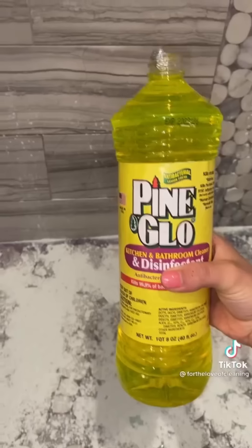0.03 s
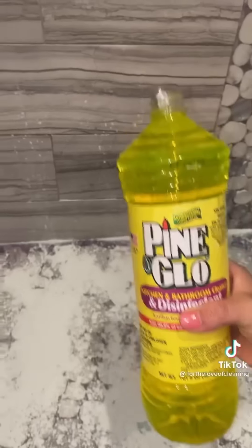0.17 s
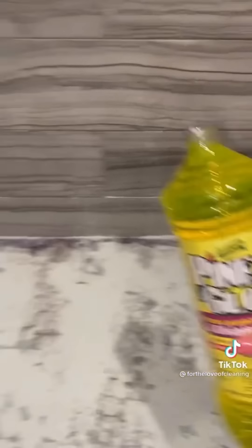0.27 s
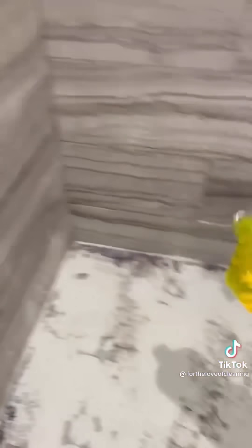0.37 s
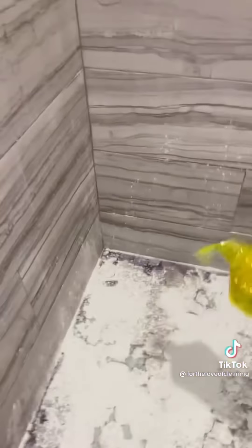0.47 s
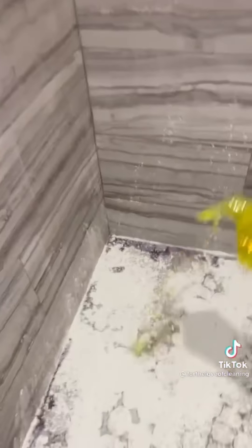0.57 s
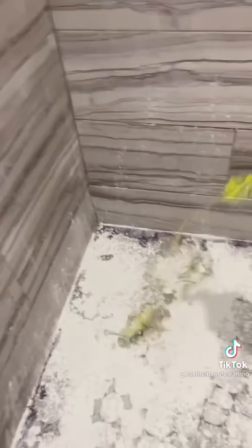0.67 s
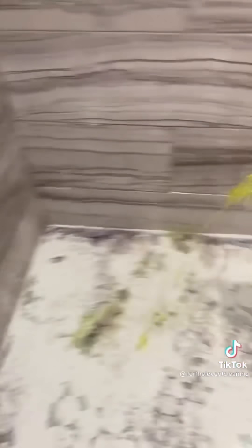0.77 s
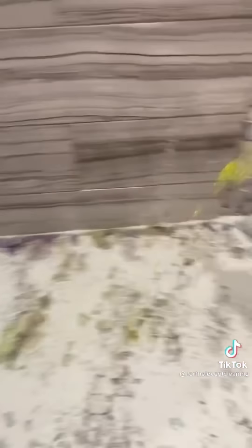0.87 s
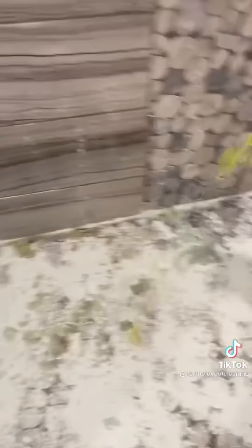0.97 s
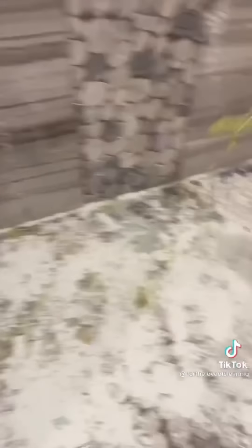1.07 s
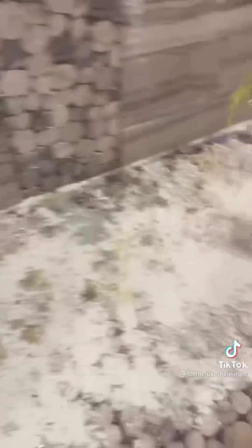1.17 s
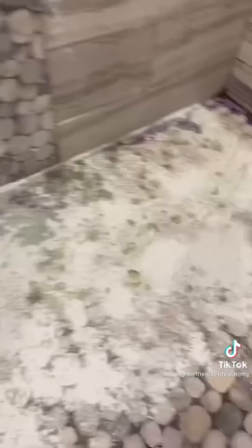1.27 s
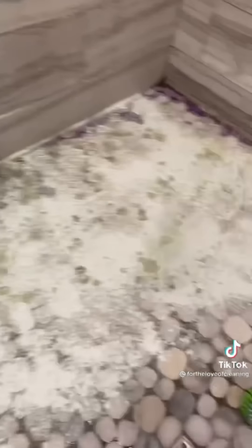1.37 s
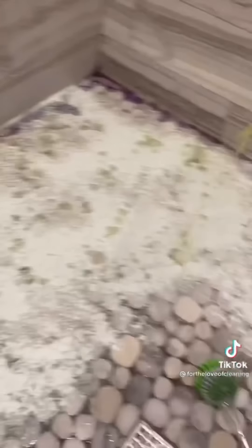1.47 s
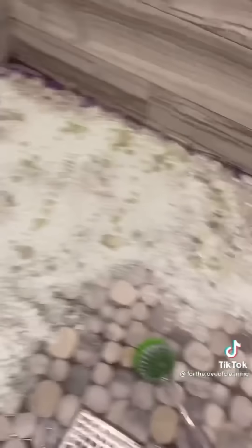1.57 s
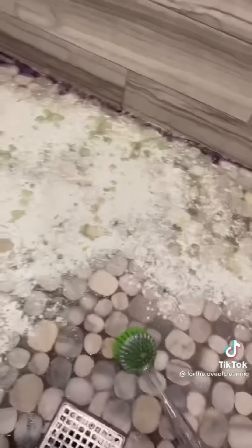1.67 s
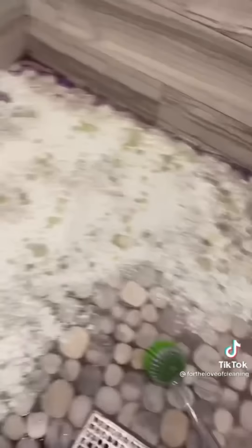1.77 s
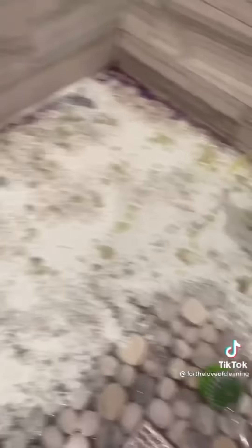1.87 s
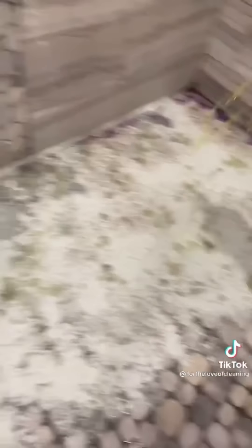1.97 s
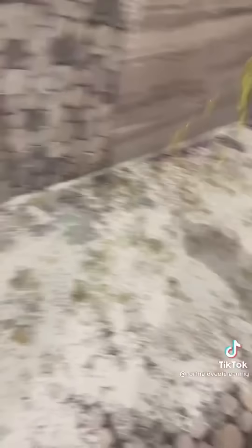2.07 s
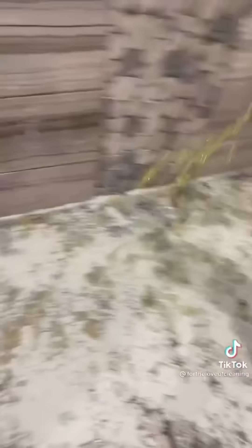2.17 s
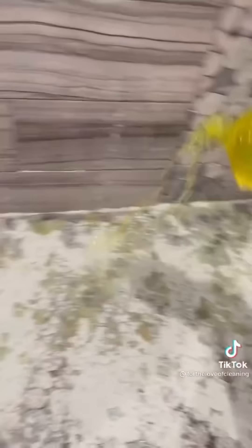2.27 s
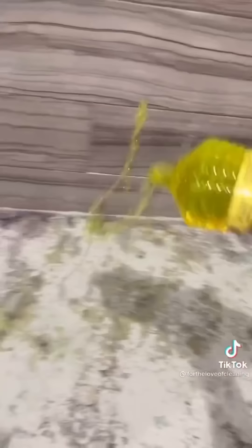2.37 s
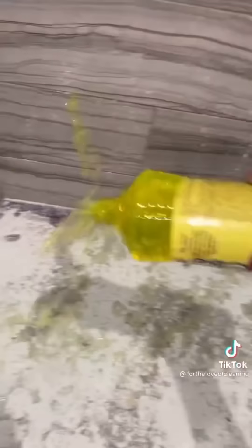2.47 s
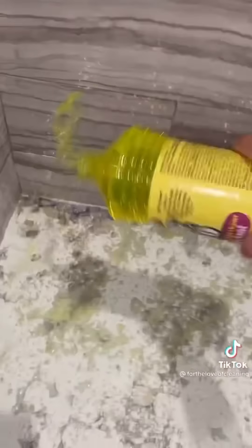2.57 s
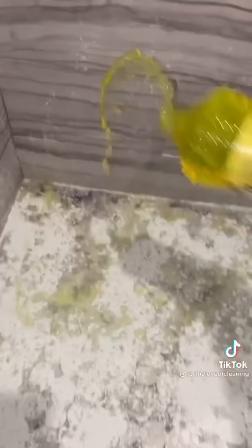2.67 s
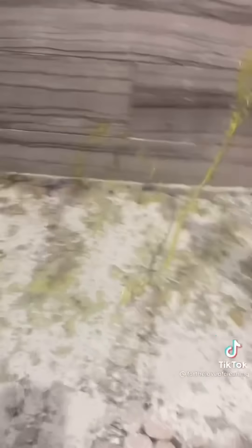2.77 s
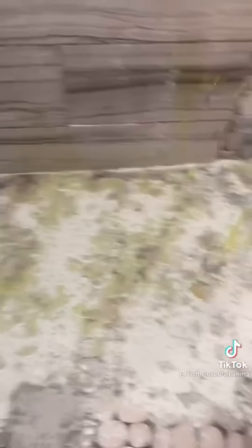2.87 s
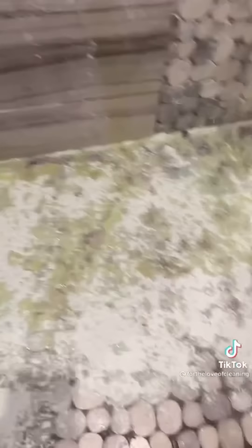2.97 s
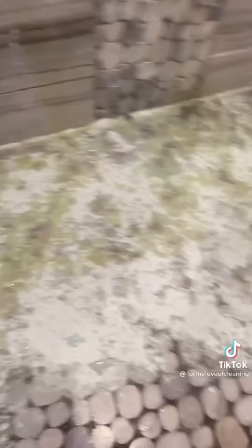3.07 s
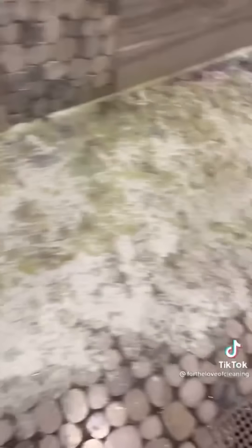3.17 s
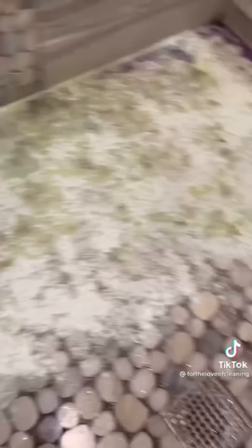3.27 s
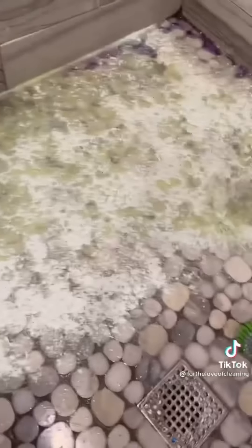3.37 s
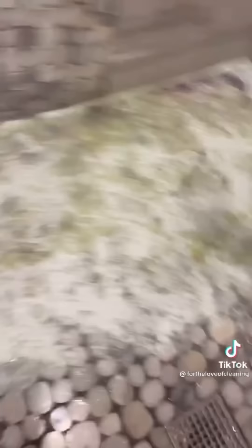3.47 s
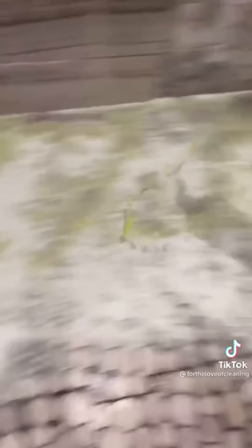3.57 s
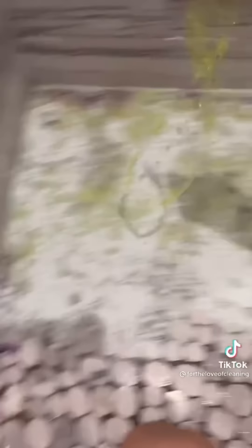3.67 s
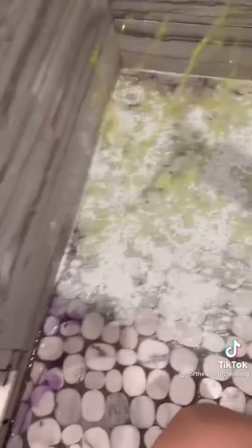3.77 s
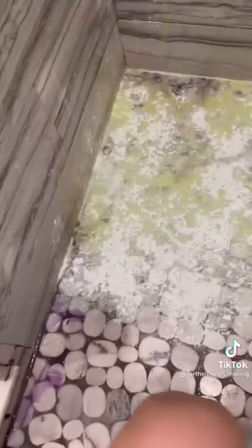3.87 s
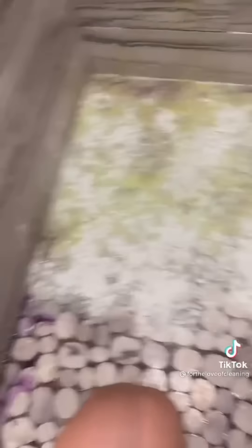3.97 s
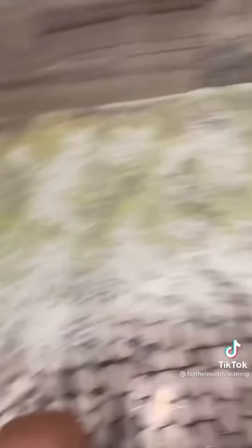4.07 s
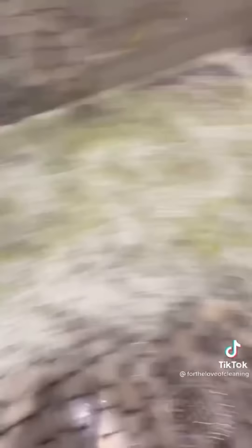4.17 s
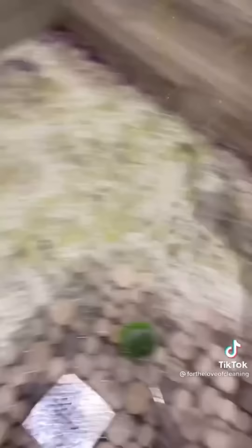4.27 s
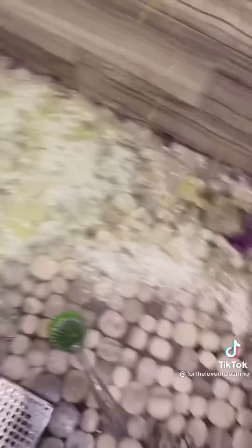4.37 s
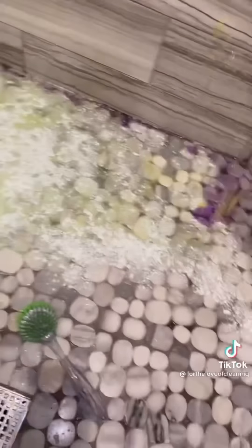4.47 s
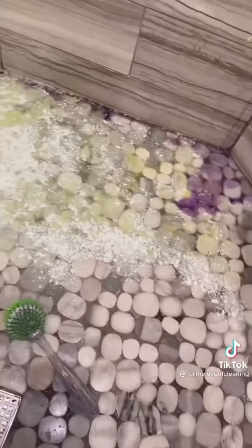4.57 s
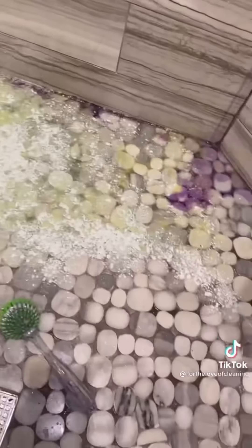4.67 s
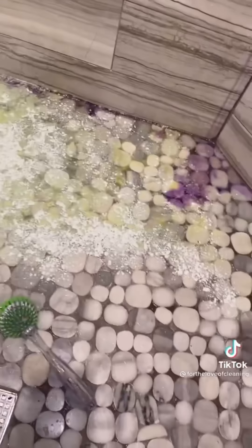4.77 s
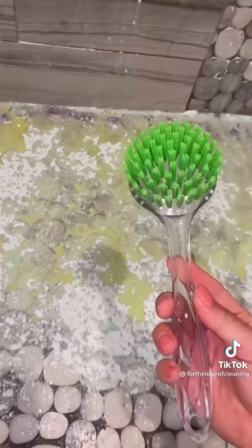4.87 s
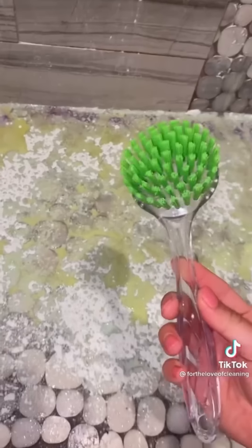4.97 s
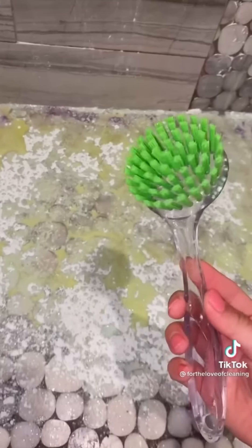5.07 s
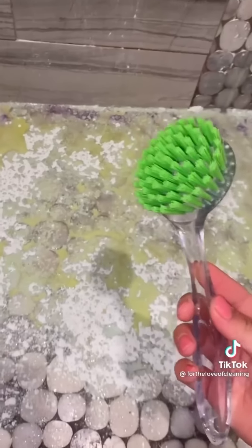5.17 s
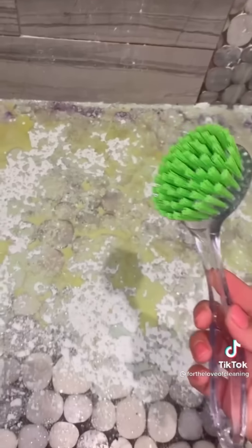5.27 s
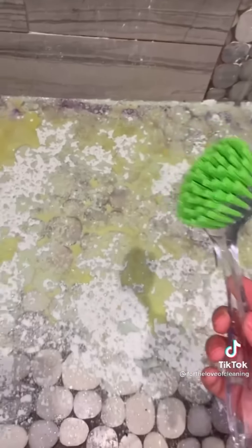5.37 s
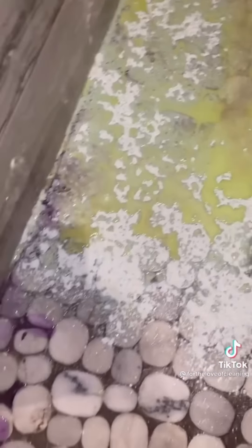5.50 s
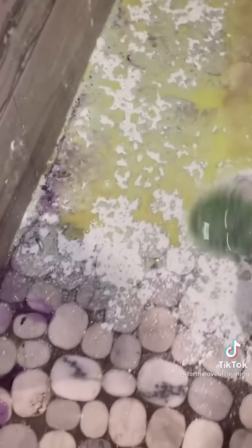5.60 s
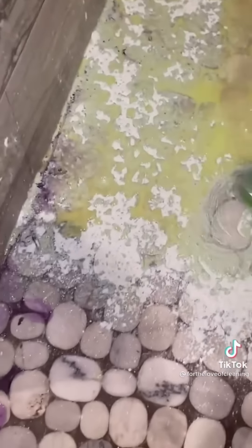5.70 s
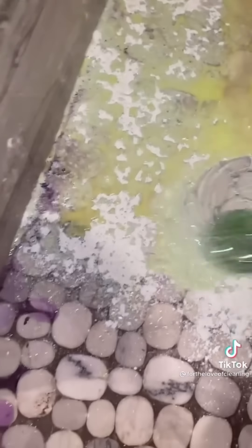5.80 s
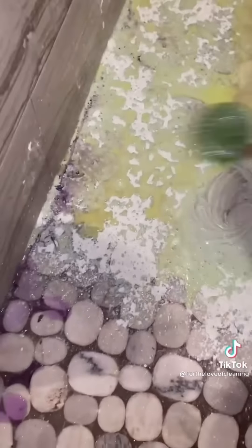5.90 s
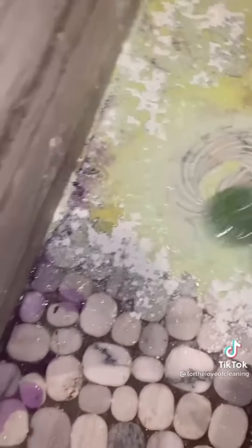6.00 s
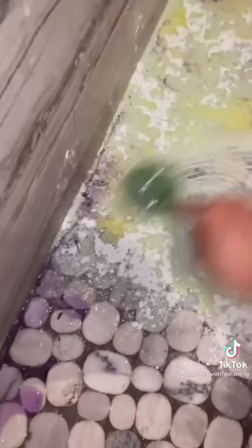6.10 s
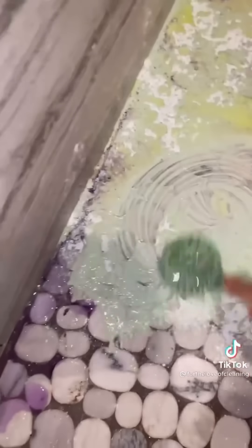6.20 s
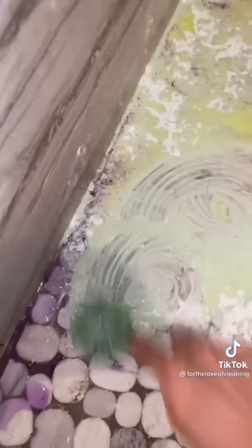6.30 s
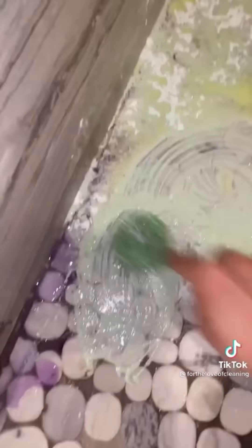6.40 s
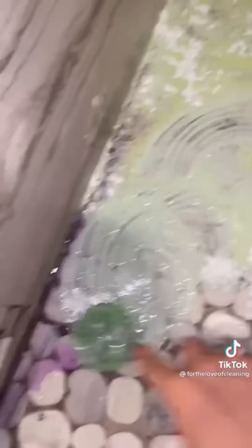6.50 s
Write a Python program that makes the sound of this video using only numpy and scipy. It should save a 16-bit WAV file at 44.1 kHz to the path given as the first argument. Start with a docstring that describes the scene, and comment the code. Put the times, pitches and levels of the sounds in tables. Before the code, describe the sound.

In a small tiled shower, bursts of splattering liquid with fizzy droplets and bottle glugs give way to rapid, scratchy wet brush scrubbing.

```python
"""Bottle splats and a scrubbing brush

Cleaning liquid is shaken out of a plastic bottle: it glugs in the neck and lands in splats on a powdered
shower floor. Splats are upswept cracks plus thousands of ringing droplets; glugs, and one small dull knock
before them, are pops with noisy wakes. The sound drops out twice, with a quiet moment between, then a stiff
brush scrubs the wet grit as shaped noise. Hard tiled walls ring briefly as sparse reflections, and the stall
hums faintly as coloured noise."""
import sys
import numpy as np
from scipy import signal
from scipy.fft import rfft, irfft
from scipy.io import wavfile
from scipy.ndimage import uniform_filter1d

SR = 44100
rng = np.random.default_rng(int(sys.argv[2]) if len(sys.argv) > 2 else 0)


def store_pcm(level_fs):
    """Save levels as 16-bit WAV."""
    pcm = np.round(np.clip(level_fs, -1, 1) * 32767).astype(np.int16)
    wavfile.write(sys.argv[1], SR, np.atleast_2d(pcm).T)


N = 288414  # length in samples


def amp(db):
    """Gain of a level in dB."""
    return 10 ** (np.asarray(db) / 20)


def evened(x):
    """Scales each row to rms 1."""
    return x / np.sqrt(np.mean(x ** 2, axis=-1, keepdims=True) + 1e-20)


def read(points, hz):
    """Reads a table on a log-frequency axis."""
    f, value = np.transpose(points)
    return np.interp(np.log(hz + 1), np.log(f + 1), value)


def curves(rows):
    """Columns of a table at every sample, and a switch that is on while the table runs."""
    s, *columns = np.transpose(rows)
    t = np.arange(N) / SR
    on = (t >= s[0]) * (t <= s[-1])
    return [np.interp(t, s, column) for column in columns], on


def add(mix, s, sound):
    """Mixes a sound in at a time in seconds."""
    part = mix[round(s * SR):][:len(sound)]
    part += sound[:len(part)]


def coloured(x, spectrum):
    """Gives x a spectrum that falls away at 10 dB more per octave outside the table, at rms 1."""
    hz = np.fft.rfftfreq(x.shape[-1], 1 / SR)
    octaves_below = np.maximum(np.log2(spectrum[0][0] / (hz + 1)), 0)
    octaves_above = np.maximum(np.log2((hz + 1) / spectrum[-1][0]), 0)
    gain_db = read(spectrum, hz) - 10.0 * (octaves_below + octaves_above)
    return evened(irfft(rfft(x) * amp(gain_db), x.shape[-1]))


def hump(hz):
    """Spectrum of a rough resonance."""
    return [(hz * 0.67, -12), (hz, 0), (hz * 1.3, -12)]


def grit(shape, spread_db, clump_s):
    """Dense noise of uneven strength, like tiny impacts that arrive in clumps."""
    clumps = evened(uniform_filter1d(rng.standard_normal(shape), max(round(clump_s * SR), 1)))
    return rng.standard_normal(shape) * amp(spread_db * clumps)


def blip(hz, cycles):
    """A few swings under a quick rise and a slower fall, energy 1."""
    turns = hz * np.arange(round(4 * cycles / hz * SR)) / SR
    envelope = (turns / cycles) ** 2 * np.exp(-3 * turns / cycles)
    swing = envelope * np.sin(2 * np.pi * turns)
    return swing / np.linalg.norm(swing)


# air modes of the stall: (pitch [Hz], width [Hz], lift [dB])
AIR_MODES = [(242.3, 6.4, 9), (276.5, 10.8, 9), (367.7, 13, 10.5), (458, 9.1, 3.5)]


def boomed(x):
    """The air between the walls favours a few pitches."""
    hz = np.fft.rfftfreq(N, 1 / SR)
    lift_db = sum(db / (1 + (2 * (hz - mode_hz) / width) ** 2) for mode_hz, width, db in AIR_MODES)
    return irfft(rfft(x) * amp(lift_db), N)


# colour of the hum before the air modes: (frequency [Hz], level [dB per Hz])
HUM_COLOUR = [(25, -8), (80, -9.5), (125, -4), (200, -21), (250, -8), (480, -9), (560, -12), (1100, -14.5),
              (1500, -16.5), (1800, -21), (8000, -34), (15500, -38)]
# swell of the hum before the air modes: (time [s], hum level [dB], low drone level [dB])
HUM_LEVEL = [(0, -59, -72.5), (3.2, -57.5, -64), (5.3, -59.5, -75), (5.4, -55, -67), (6.54, -57.5, -58.5)]
DRONE_HZ = 139


def hum():
    """Air and distant plumbing: slowly uneven noise, swelling slightly, over a low noisy drone."""
    (level_db, drone_db), _ = curves(HUM_LEVEL)
    drone = coloured(rng.standard_normal(N), hump(DRONE_HZ))
    return amp(level_db) * coloured(grit(N, 1.0, 0.24), HUM_COLOUR) + amp(drone_db) * drone


# ring of the tiled walls: (frequency [Hz], time to die by 60 dB [s])
WALL_RING = [(250, 0.86), (3000, 0.2), (15000, 0.57)]


def stall(x):
    """Sparse reflections of random sign, each band dying at its own speed."""
    taps, start = np.zeros(SR // 2), np.arange(120, SR // 2 - 20, 20)
    taps[start + rng.integers(0, 20, len(start))] = rng.choice([-1., 1.], len(start))
    hz, t, bands = signal.stft(taps, SR, nperseg=256)
    t60 = np.clip(read(WALL_RING, hz), .03, 2)[:, None]
    tail = signal.istft(bands * amp(-60 * t / t60), SR, nperseg=256)[1]
    return signal.oaconvolve(x, tail / np.linalg.norm(tail))[:N]


# stray drops between the splats, and liquid moving in the bottle:
# (time [s], patter level [dB], fizz level [dB], slosh level before the air modes [dB])
DRIZZLE = [(0, -77, -83, -73), (.34, -67, -74, -59.5), (.6, -42, -53.5, -53), (1.5, -48, -52, -54.5),
           (3.4, -47.5, -66.5, -52), (4.3, -46, -47.5, -50.5), (4.76, -67.5, -78, -76.5)]
# colour of the slosh before the air modes: (frequency [Hz], level [dB per Hz])
SLOSH_COLOUR = [(80, -8.5), (300, -6.5), (500, 1.5), (800, -5.5), (1400, -6)]
SWILL_DB = 3  # unevenness of the slosh


def slosh():
    """Liquid swills inside the bottle: low noise in uneven clumps."""
    (*_, slosh_db), on = curves(DRIZZLE)
    return on * amp(slosh_db) * coloured(grit(N, SWILL_DB, 0.03), SLOSH_COLOUR)


# low bubbling pops, and one small dull knock at 0.36 s:
# (time [s], nominal level [dB], pitch [Hz], wake decay by 60 dB before limits [s])
GLUGS_AND_KNOCK = [(0.362, -38, 450, 0.028), (0.606, -40, 189, 0.12), (0.689, -30, 1040, 0.17),
                   (2.247, -28, 898, 0.06), (2.663, -31.5, 430, 0.1), (2.817, -38.5, 1280, 0.45),
                   (3.185, -28, 1410, 0.32), (3.271, -32, 264, 0.22), (3.643, -39, 417, 0.46),
                   (3.685, -29.5, 253, 0.052), (3.875, -27, 1280, 0.062), (3.879, -33, 291, 0.19),
                   (4.09, -32.5, 497, 0.11), (4.302, -33.5, 290, 0.13)]
POP_S = 0.0025  # time scale of the opening pop


def glugs_and_knock():
    """Bubbling pops and one small dull knock: each is a short pop and a noisy wake roughly at its own pitch."""
    t, out = np.arange(12000) / SR, np.zeros(N)
    noises = rng.standard_normal((len(GLUGS_AND_KNOCK), len(t)))
    for (s, db, hz, t60), noise in zip(GLUGS_AND_KNOCK, noises):
        envelope = np.minimum(t / 0.012, 1) * amp(-60 * t / np.clip(t60, .03, .6))
        wake = coloured(noise, hump(hz)) * envelope
        add(out, s, amp(db - 1.0) * wake)
        add(out, s, amp(db + 12.0) * blip(hz, max(hz * POP_S, .8)))
    return out


# the brush circles: (time [s], scrape level of the head [dB], hiss level of the bristle tips [dB])
STROKES = [(5.422, -70, -84), (5.442, -53, -54), (5.482, -54, -51), (5.51, -43, -46), (5.6, -45, -45),
           (5.68, -39.5, -42), (5.716, -47, -45.5), (5.752, -42, -38), (5.852, -38, -39), (5.958, -44, -44),
           (5.974, -44.5, -34.5), (6.038, -33, -36.5), (6.082, -43.5, -44), (6.152, -53, -46),
           (6.168, -39.5, -37), (6.22, -36, -35), (6.27, -42.5, -40.5), (6.394, -35.5, -33),
           (6.432, -45.5, -44), (6.462, -36, -30.5), (6.512, -45, -44.5), (6.54, -32, -30)]
# colours of the plastic head and of the bristle tips: (frequency [Hz], level [dB per Hz])
HEAD_COLOUR = [(600, -29.5), (1700, -18), (2300, -7.5), (3000, -2), (3900, -9), (5000, -8.5), (9000, -25)]
TIP_COLOUR = [(4000, -5.5), (7000, -6), (11000, -1), (13000, -5), (15500, -12.5)]
# the brush is set down: (time [s], reference level [dB])
KNOCKS = [(5.4384, -35)]
# modes of a knock: (pitch [Hz], peak over the knock's level [dB], length [swings])
KNOCK_MODES = [(2080, 2, 2.5), (3370, -0.5, 6.1)]
TURN_DB = 1.8  # depth of the head's shifting colour
RATTLE_DB, RATTLE_T60_S = -12, 0.11  # grit rattles under the head after a knock


def brush():
    """Bristles slip over grit: slips ring the plastic head, its colour shifting as it turns, and hiss at the tips."""
    (scrape_db, hiss_db), on = curves(STROKES)
    bands = signal.stft(coloured(grit(N, 1.3, 0.0018), HEAD_COLOUR), nperseg=512)[2]
    patches = uniform_filter1d(rng.standard_normal(bands.shape), size=9, axis=0)  # across frequency
    patches = evened(uniform_filter1d(patches, size=10).ravel()).reshape(bands.shape)  # across time
    scrape = evened(signal.istft(bands * amp(TURN_DB * patches), nperseg=512)[1][:N])
    hiss = coloured(grit(N, 1.4, 0.001), TIP_COLOUR)
    out = on * (amp(scrape_db) * scrape + amp(hiss_db) * hiss)
    t = np.arange(4000) / SR
    for s, db in KNOCKS:
        rattle = coloured(rng.standard_normal(len(t)), HEAD_COLOUR)
        add(out, s + 0.00109, amp(db + RATTLE_DB - 60 * t / RATTLE_T60_S) * rattle)
        for hz, mode_db, swings in KNOCK_MODES:
            knock = blip(hz, swings)
            add(out, s, amp(db + mode_db) * knock / abs(knock).max())
    return out


# a fleck of foam spits: (time [s], peak level [dB], pitch [Hz])
SPITS = [(0.293, -42.5, 7080), (0.863, -24.5, 11200), (1.163, -29, 11000), (2.0438, -25, 12500),
         (2.5925, -21, 12500), (3.402, -25, 9670), (3.6384, -26, 4600), (4.056, -23.5, 10000),
         (4.43, -20, 10000)]
SPIT_T60_S = 0.025


def spits():
    """Each fleck is a short, bright snap of noise."""
    t, out = np.arange(2000) / SR, np.zeros(N)
    for (s, db, hz), noise in zip(SPITS, rng.standard_normal((len(SPITS), len(t)))):
        snap = coloured(noise, hump(hz)) * amp(-60 * t / SPIT_T60_S)
        add(out, s, amp(db) * snap / abs(snap).max())
    return out


# a slug of liquid lands: (time [s], nominal spray level [dB], pitch [Hz], pitch spread before limits [octaves],
# nominal fizz level [dB], rise before limits [s])
SPLATS = [(.361, -49.5, 2980, 0.24, -61, 0.013), (0.4701, -43, 2510, 0.36, -49, 0.00076),
          (0.507, -36.5, 2700, 0.55, -49, 0.0068), (0.64, -21, 3130, 0.11, -33.5, 0.0081),
          (.65, -24.5, 2880, 0.26, -51, 0.00061), (0.686, -28.5, 3700, 0.35, -56, 0.006),
          (.792, -32.5, 3470, 0.069, -41, 0.00082), (0.874, -28, 2180, 0.15, -41.5, 0.012),
          (0.932, -40.5, 2320, 0.89, -41, 0.0022), (1.033, -46, 3600, 1, -43, 0.017),
          (1.13, -30.5, 4200, 0.45, -28.5, 0.0012), (1.158, -29.5, 4100, 0.5, -53, 0.019),
          (1.2213, -34.5, 4030, 0.52, -49.5, 0.0011), (1.264, -33.5, 3180, 0.78, -34, 0.0032),
          (1.3126, -28.5, 3900, 0.46, -56, 0.0013), (1.3563, -25.5, 4810, 0.46, -41, 0.0012),
          (1.369, -19.5, 3340, 0.33, -46.5, 0.0035), (1.385, -36, 3820, 0.29, -57.5, 0.0006),
          (1.426, -33.5, 3560, 0.54, -33.5, 0.0015), (1.549, -32, 4630, 0.37, -46.5, 0.0082),
          (1.56, -34.5, 4510, 0.38, -51.5, 0.0007), (1.6042, -19.5, 3310, 0.39, -39.5, 0.0012),
          (1.743, -32.5, 6700, 0.59, -52, 0.001), (1.835, -24.5, 4200, 0.48, -30, 0.0024),
          (1.949, -29, 3420, 0.52, -43, 0.0049), (1.9674, -25.5, 4240, 0.5, -54, 0.001),
          (2.044, -24, 3020, 0.5, -33, 0.024), (2.1, -24, 4060, 0.35, -33, 0.0012),
          (2.136, -25.5, 3800, 0.6, -30.5, 0.028), (2.243, -34.5, 2600, 0.55, -39.5, 0.016),
          (2.337, -35.5, 2950, 0.55, -39.5, 0.032), (2.4116, -33.5, 4850, 0.62, -42, 0.00086),
          (2.463, -32, 2900, 0.54, -35, 0.02), (2.5895, -29.5, 3520, 1.4, -39, 0.0055),
          (2.6, -29, 7000, 0.19, -45.5, 0.0098), (2.669, -28.5, 5500, 0.64, -48, 0.0014),
          (2.697, -33, 3100, .1, -35, 0.024), (2.789, -24, 3600, 0.37, -57.5, 0.0035),
          (2.799, -38, 4540, 0.2, -60, 0.00065), (2.824, -35, 4700, 0.24, -37.5, 0.0045),
          (2.9326, -35.5, 2970, 0.26, -38, 0.014), (2.9653, -20, 3100, 0.37, -29.5, 0.0011),
          (3.006, -32.5, 3900, 0.65, -38.5, 0.0037), (3.047, -26.5, 3980, 0.66, -42, 0.0031),
          (3.116, -26, 3920, 0.29, -63, 0.0017), (3.131, -36, 4150, 0.55, -37.5, 0.00086),
          (3.168, -24, 2455, 0.47, -33, 0.00097), (3.28, -38.5, 2560, 0.42, -31.5, 0.024),
          (3.34, -33.5, 2800, 0.27, -42, 0.046), (3.387, -32, 2120, 0.45, -32, 0.018),
          (3.466, -58, 3220, 0.27, -35.5, 0.0033), (3.5, -32.5, 1940, 0.43, -32, 0.02),
          (3.575, -28.5, 4750, 0.56, -43.5, 0.0052), (3.625, -26, 3840, 0.59, -34.5, 0.0041),
          (3.695, -33, 4240, 0.68, -64, 0.00089), (3.747, -30, 3340, 1.2, -31.5, 0.0025),
          (3.758, -29, 3150, 0.23, -56, 0.00055), (3.808, -31, 3150, 0.21, -61, 0.0038),
          (3.866, -38, 3450, 0.9, -37, 0.0034), (3.878, -42, 4450, 0.24, -44, 0.00042),
          (3.92, -39.5, 1930, 0.42, -60.5, 0.0026), (3.9715, -29.5, 3700, 0.6, -35, 0.013),
          (4.049, -52, 3520, 0.9, -38, 0.0011), (4.091, -37, 3000, 0.65, -33, 0.005),
          (4.202, -33.5, 3340, 0.47, -34.5, 0.037), (4.309, -27, 4000, 0.43, -33, 0.028),
          (4.334, -27, 3400, 0.21, -42, 0.001), (4.415, -41, 4560, 0.7, -31, 0.012),
          (4.556, -46, 4400, 1, -37.5, 0.028)]
CRACK_DB, SUDDEN_S = 14.5, 0.00079  # crack over spray for a landing with this rise
BLUNTING_DB = 11.5  # crack level lost per doubling of the rise
TORN_RAD = .42  # phase wobble of a crack


def cracks():
    """The pocket of air under each slug snaps shut, so its pitch sweeps up; ragged slugs sweep wider and longer."""
    out = np.zeros(N)
    ragged = evened(uniform_filter1d(rng.standard_normal((len(SPLATS), SR // 100)), size=13))
    for (s, spray_db, hz, spread, _, rise), flutter in zip(SPLATS, ragged):
        db = spray_db + CRACK_DB - BLUNTING_DB * np.log2(max(rise, .0003) / SUDDEN_S)
        length_s = np.clip(0.0342 * spread ** 2, .0016, .006)
        u = np.arange(0, 1, 1 / (length_s * SR))  # progress through the crack
        sweep_hz = hz * 2 ** (4.09 * min(spread, .5) * (u - .55))
        swell = amp(db + 1.3 * flutter[:len(u)]) * np.sin(np.pi * u) ** 2  # torn edges make it flutter
        wobble = TORN_RAD * flutter[::-1][:len(u)]
        add(out, s - .001, swell * np.sin(2 * np.pi * np.cumsum(sweep_hz) / SR + wobble))
    crack_high_pass = signal.butter(4, 1300, 'high', fs=SR, output='sos')
    return signal.sosfilt(crack_high_pass, out)


DROP_HZ = np.geomspace(800, 15400, 70)  # pitches of the drop sizes, large to small
EDGE = 2.24  # steepness of a splat's band towards small drops


def sizes(hz, spread, skirt_db):
    """Power share of each drop size around a pitch, with a few strays of all sizes."""
    away = np.log2(DROP_HZ / hz) / np.clip(spread, .04, 1.5)
    share = np.exp(-.5 * abs(away) ** np.where(away > 0, EDGE, 2)) + amp(2 * skirt_db)
    return share / share.sum()


# colour of the fizzing foam: (frequency [Hz], level [dB per Hz])
FIZZ_COLOUR = [(3000, -12.5), (7000, 1.5), (11000, 5), (13000, -1.5), (15500, -10)]
STEP = 32  # samples between points of an envelope
SPRAY_T60_S, TYPICAL_DB = 0.19, -33  # spray decay of a slug at the typical level
LINGER = 0.089  # weaker slugs linger: dB of time per dB
HOLD = 1.04  # above 1 a splat holds before it dies away
FINE_FADE = 0.41  # finer fizz dies sooner still: extra decay per octave of pitch


def splat_power():
    """Power over time for each drop size: spray and fizz of every splat, over the stray drops."""
    # doubling a dB value inside amp() gives power
    foam = amp(2 * read(FIZZ_COLOUR, DROP_HZ)) * DROP_HZ * (DROP_HZ > FIZZ_COLOUR[0][0])
    foam = foam[:, None] / foam.sum()
    fade = np.maximum(1.35 + FINE_FADE * np.log2(DROP_HZ / 9000), 1)[:, None]
    (patter_db, fizz_db, _), on = curves(DRIZZLE)
    patter = sizes(2920, 0.56, -24.0)[:, None] * amp(2 * patter_db[::STEP])
    power = (patter + foam * amp(2 * fizz_db[::STEP])) * on[::STEP]
    t = np.arange(0, .4, STEP / SR)
    for s, spray_db, hz, spread, fizz_db, rise in SPLATS:
        rise = np.clip(rise, .001, .08)
        t60 = np.clip(SPRAY_T60_S * amp(LINGER * (TYPICAL_DB - spray_db)), .03, 1)
        decay = amp(-60 * (np.maximum(t - rise, 0) / t60) ** HOLD)
        shape = (0.3 + 0.49 * np.minimum(t / rise, 1)) * decay
        spray = sizes(hz, spread, -28.0)[:, None] * (amp(spray_db) * shape) ** 2
        fizz = foam * (amp(fizz_db) * shape ** fade) ** 2  # fizz dies sooner than the spray
        add(power.T, s / STEP, (spray + fizz).T)
    return power


CLUMP_DB = 1.42  # drops of all sizes come in bunches a few milliseconds long


def droplets(per_cycle=.3, spread_db=3.5, cycles=8.64):
    """Each size lands at random moments and rings for a few swings; some drops hit much harder."""
    out, n = np.zeros(N), round(DRIZZLE[-1][0] * SR)
    power_by_size = splat_power()
    bunches = evened(uniform_filter1d(rng.standard_normal(power_by_size.shape[1]), size=5))
    for hz, power in zip(DROP_HZ, power_by_size * amp(2 * CLUMP_DB * bunches)):
        lands, force = rng.random(n), rng.exponential(1, n)
        blows = (lands < per_cycle * hz / SR) * amp(spread_db * np.minimum(force, 5))
        level = np.repeat(np.sqrt(power), STEP)[:n]
        out[:n] += signal.oaconvolve(evened(blows) * level, blip(hz, cycles))[:n]
    return out


def scene():
    """Near sounds, their reflections and the hum."""
    near = boomed(slosh()) + glugs_and_knock() + brush() + spits() + cracks() + droplets()
    return (near + amp(-10.0) * stall(near) + boomed(hum()))[None]


# dropouts: (sound drops out [s], starts back [s], is back [s])
CUTS = [(4.745, 4.785, 4.826), (5.306, 5.335, 5.372)]
EDGE_HZ = 15550  # top of the sound's band


def record(dry):
    """Each cut drops the level by 32 dB, sinking to 50 dB, and fades back in; then a low-pass limits the band."""
    t, gain_db = np.arange(N) / SR, np.zeros(N)
    for out_s, start_s, back_s in CUTS:
        times = [out_s, out_s + .003, start_s, back_s - .006, back_s]
        gain_db += np.interp(t, times, [0, -32, -50, -12, 0])
    low_pass = signal.firwin(801, EDGE_HZ, window=("kaiser", 8), fs=SR)
    return signal.oaconvolve(dry * amp(gain_db), low_pass[None], "same")


dry = scene()
out = record(dry)
store_pcm(out)
```